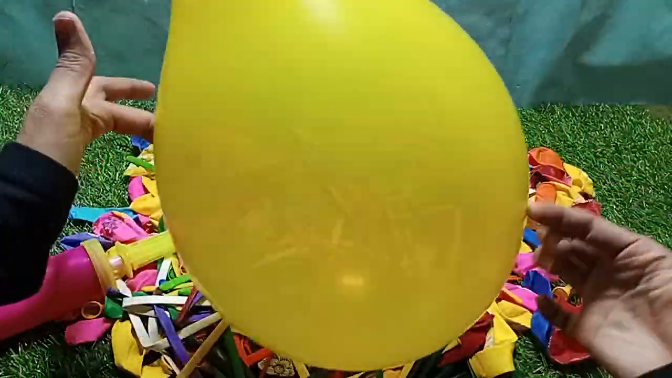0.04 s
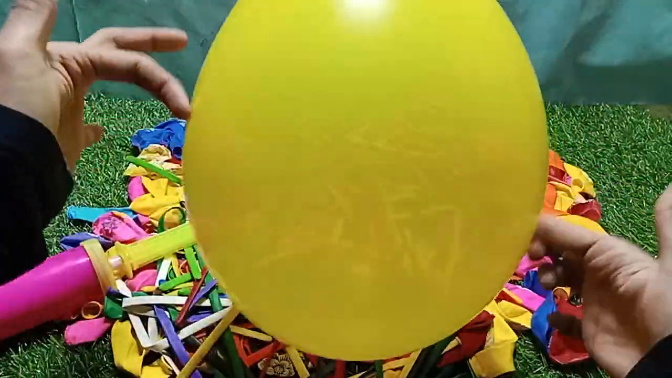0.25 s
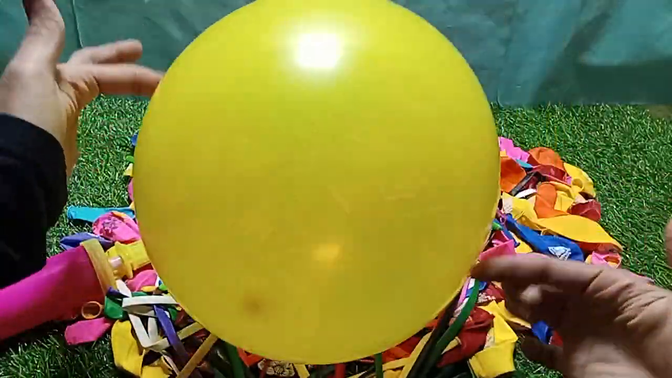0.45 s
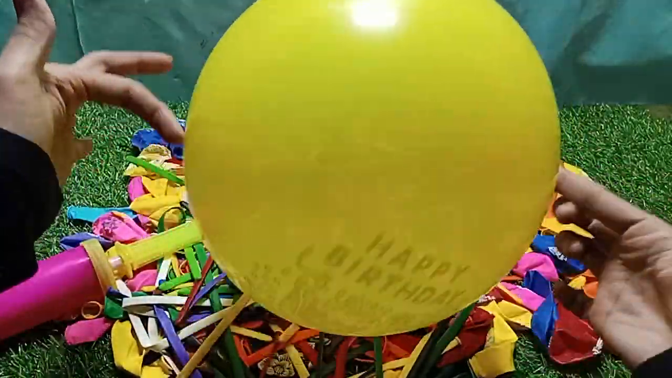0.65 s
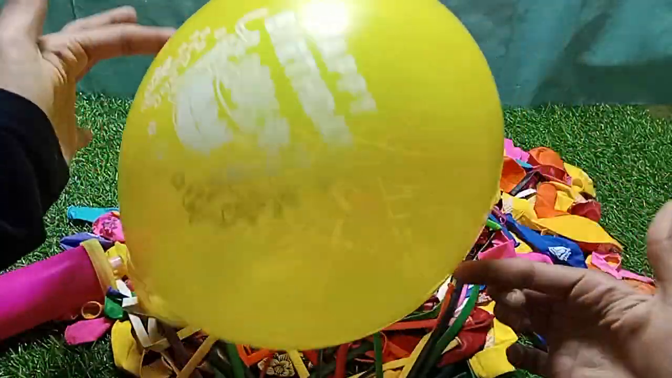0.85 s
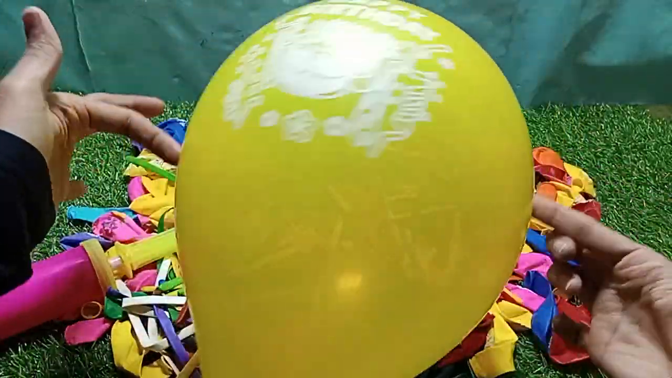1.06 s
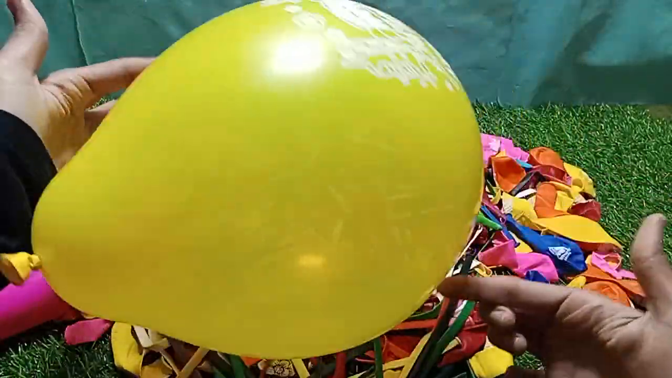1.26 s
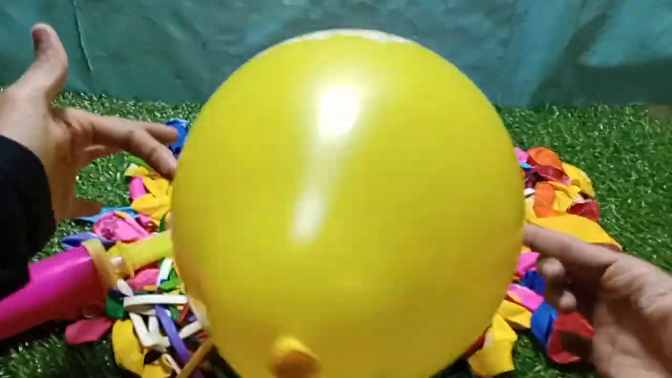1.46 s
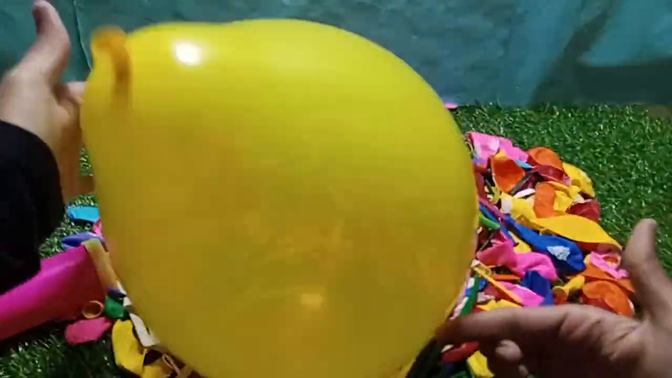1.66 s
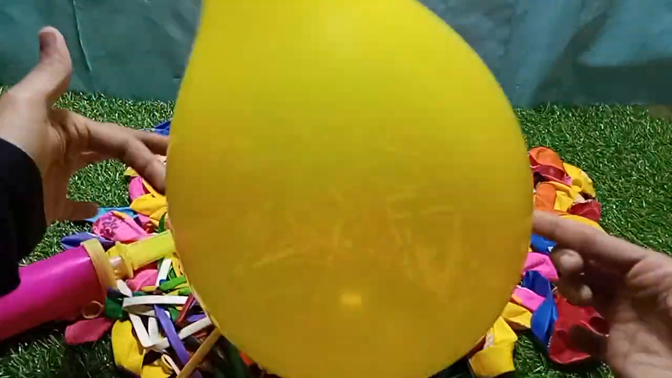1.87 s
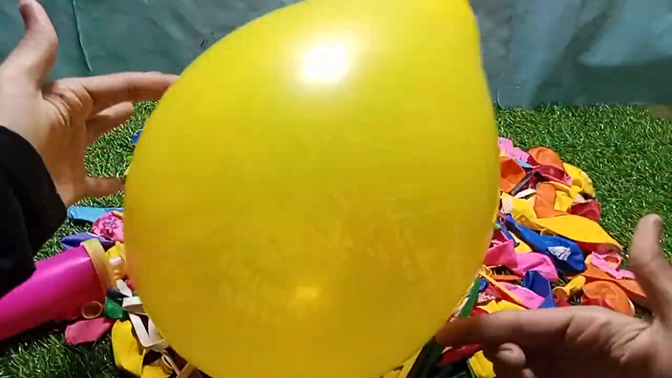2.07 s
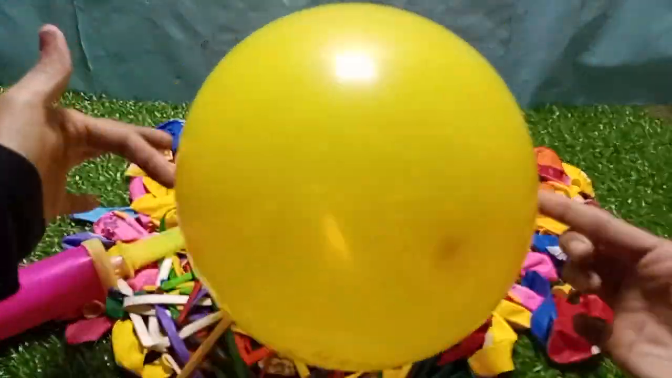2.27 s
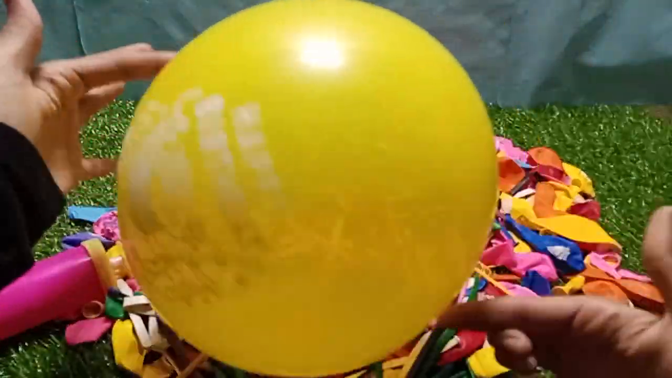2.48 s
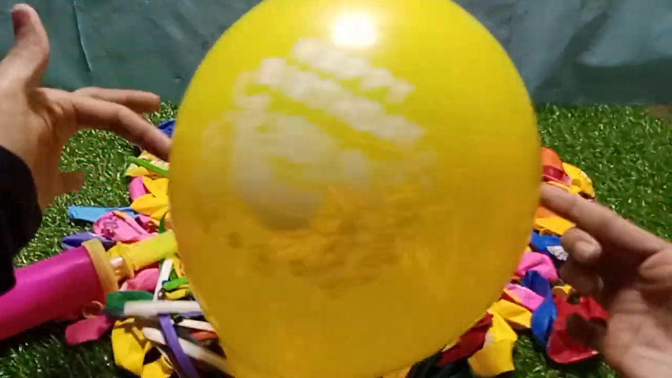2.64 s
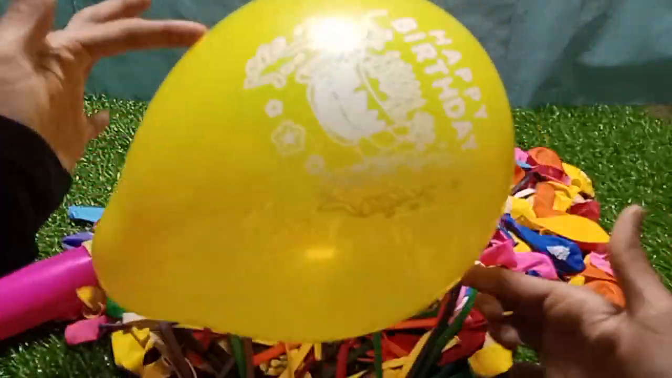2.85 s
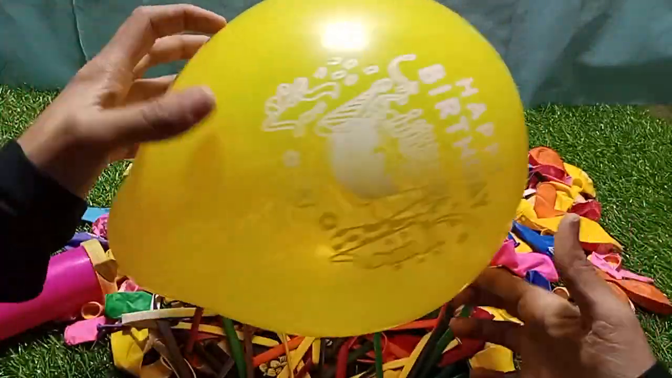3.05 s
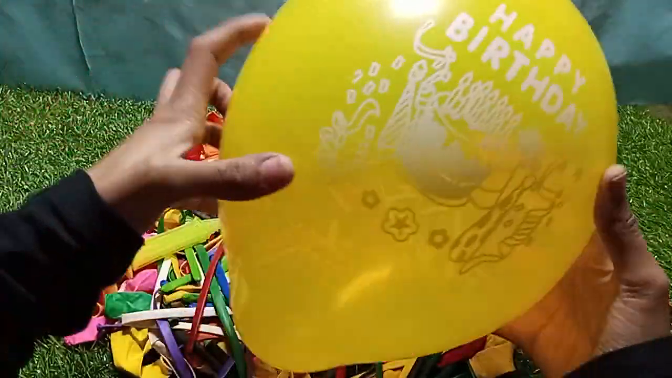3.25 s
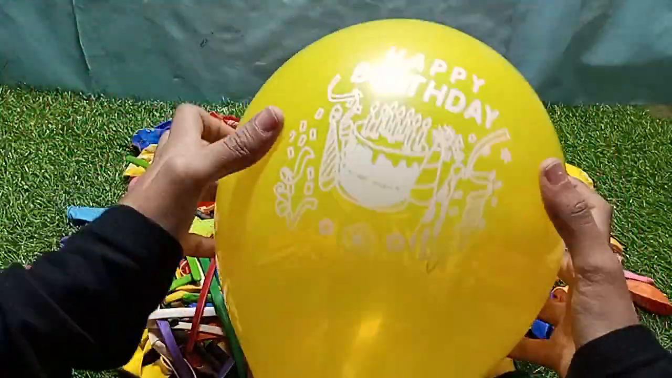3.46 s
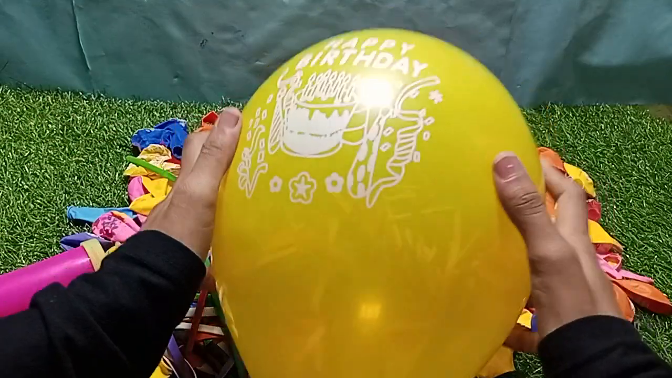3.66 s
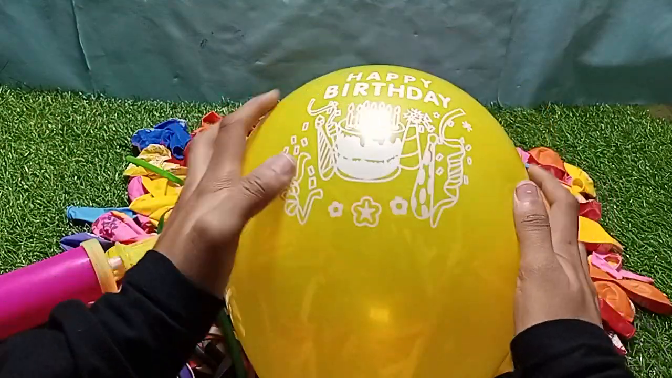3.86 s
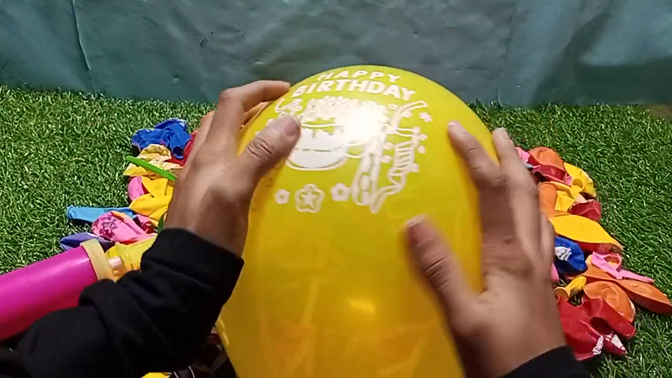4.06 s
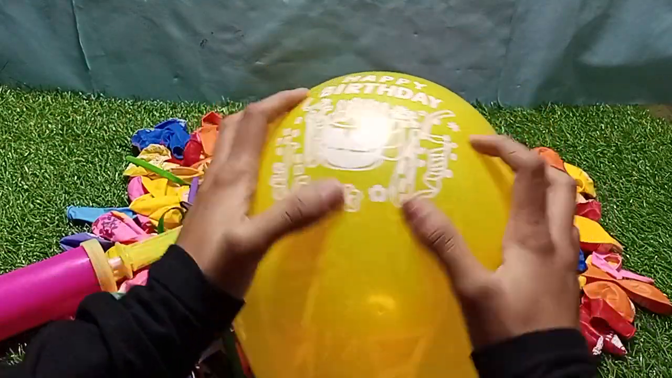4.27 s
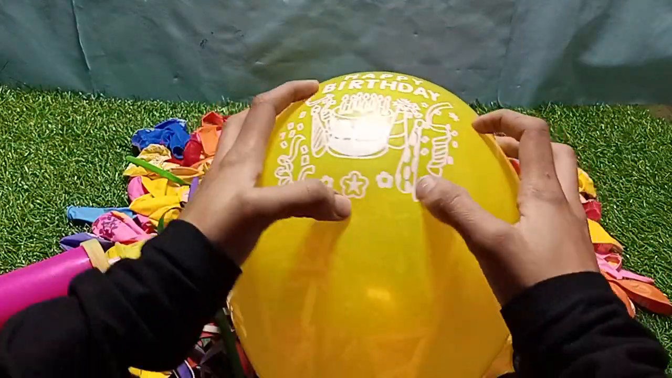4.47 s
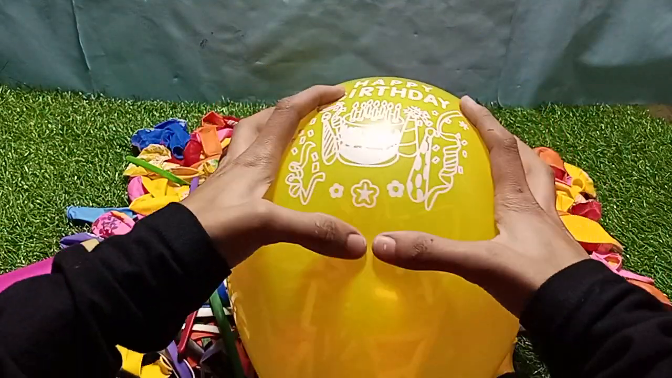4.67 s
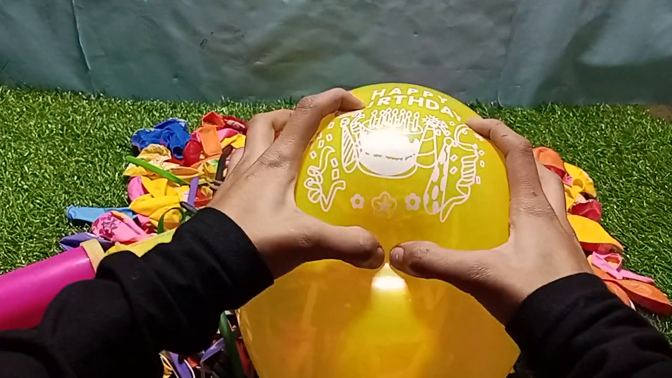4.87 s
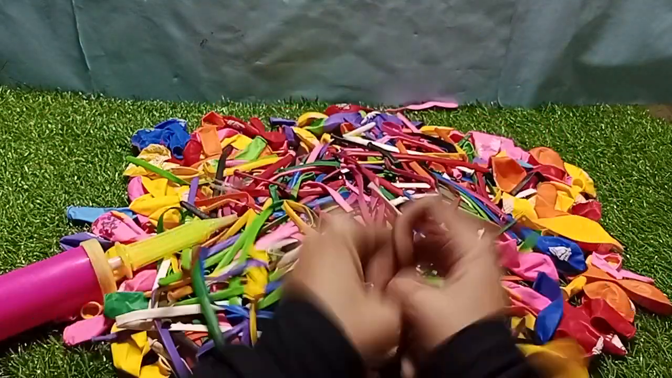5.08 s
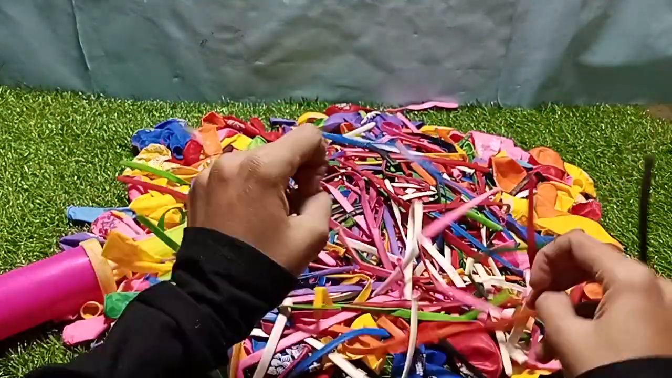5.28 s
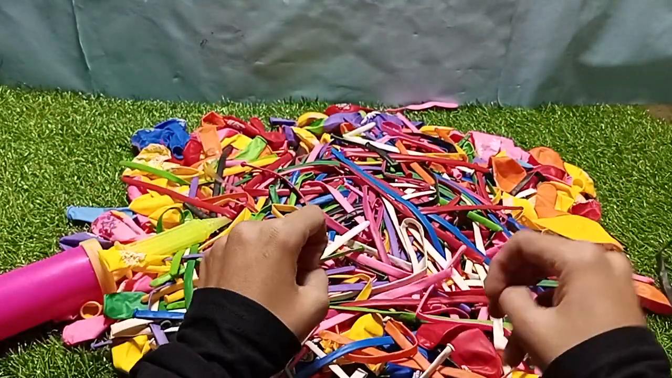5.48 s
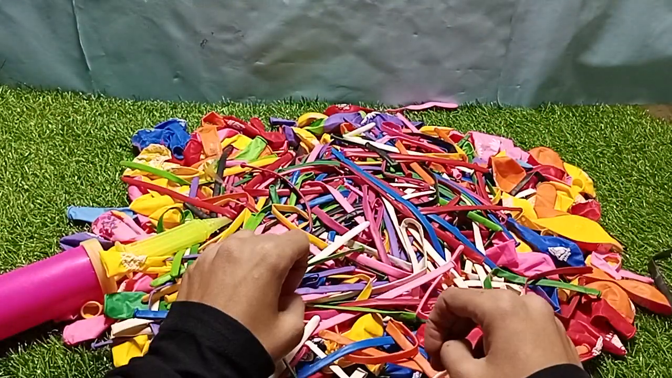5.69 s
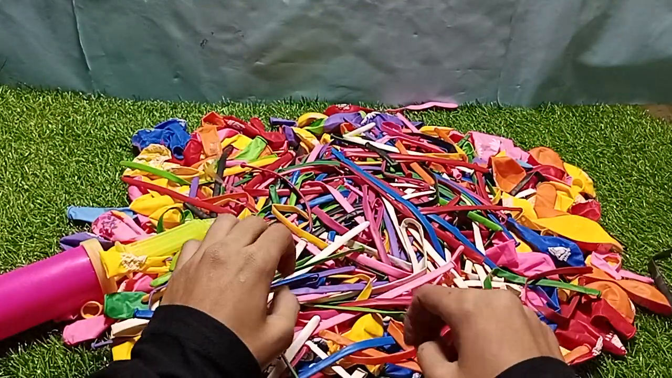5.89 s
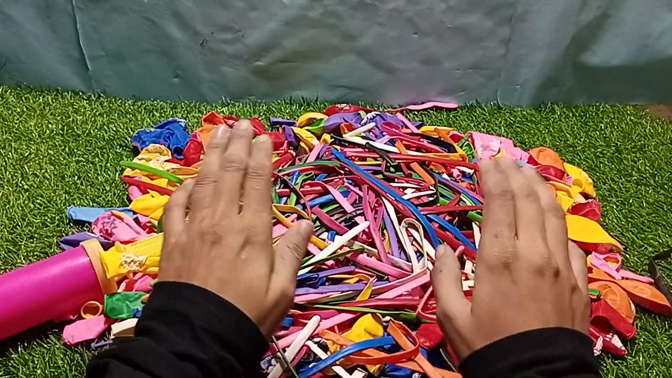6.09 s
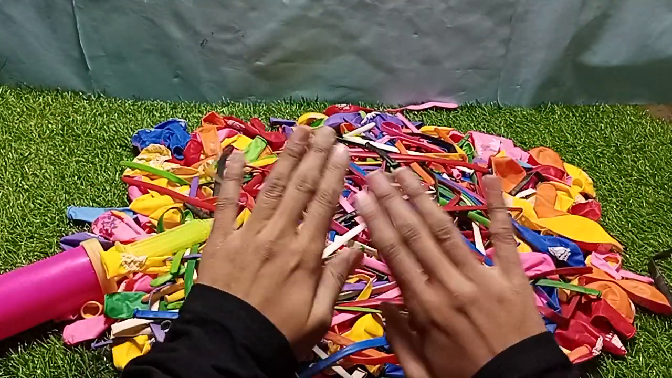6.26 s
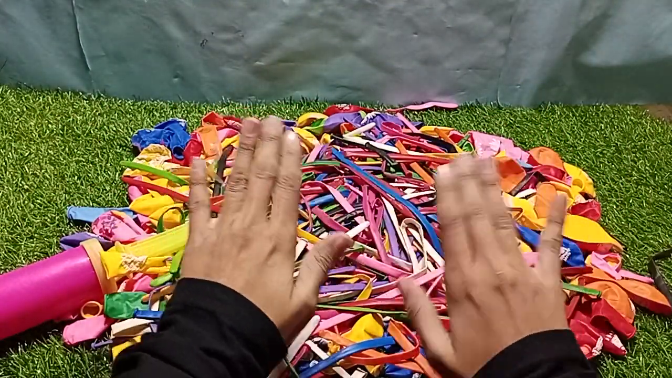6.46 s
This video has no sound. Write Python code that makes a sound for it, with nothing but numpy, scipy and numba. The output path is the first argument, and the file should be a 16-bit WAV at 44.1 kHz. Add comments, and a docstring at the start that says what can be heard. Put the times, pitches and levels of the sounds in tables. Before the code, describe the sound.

In a small quiet room, close to the microphone, fingertips softly bump and brush an inflated balloon. Hands then grip it, rubbing with dry rasp, hiss and short hoarse squeaks that grow stronger. Low hollow booms and hard snaps follow as it is squeezed, until it bursts in a very loud, slightly clipped bang with a short room ring. Small bright clinks and dull thuds follow, then faint noise.

```python
"""A small room: an inflated latex balloon is turned over in the fingers, then gripped, rubbed and squeezed until it bursts.
Random slips excite the resonances of the skin as rasp, hiss, hollow note and creak; snaps and squeaks stand out.
Ringing and gliding low sines are the air inside, booming when bumped or juddered.
The bang is shaped, decaying noise with room modes and a falling zip; then something small and hard clinks in damped sines.
Swells of low noise are hands and balloon on a heap of empty balloons, over steady air noise and a later noise floor."""
import sys
import numpy as np
from scipy import signal
from scipy.fft import rfft, irfft
from scipy.io import wavfile
from scipy.ndimage import uniform_filter1d, minimum_filter1d
from numba import njit

SR = 44100
rng = np.random.default_rng(int(sys.argv[2]) if len(sys.argv) > 2 else 0)


def dump_mix(stems):
    """Bounce the given channels to the path in sys.argv[1] as a 16-bit WAV at rate SR."""
    frames = np.atleast_2d(stems).T  # one column per channel
    limited = np.clip(frames, -1, 1)  # hard clip at full scale
    pcm = np.round(limited * 32767).astype(np.int16)
    wavfile.write(sys.argv[1], SR, pcm)


N = 287796
TIME = np.arange(N) / SR
BURST_S = 5.149

# spectrum of the rubbed skin: [f/Hz, level/dB]
SKIN_COLOUR = [(560, -30.5), (950, -4), (1230, -3), (1860, -6), (2200, -6), (2750, -5), (3360, -7.5),
               (4020, -2.5), (5210, -3.5), (6520, -1), (8060, -9.5), (10200, 2), (13400, -11.5),
               (15100, -3), (16000, -7)]
# spectrum of the creaking, scuffed skin: [f/Hz, level/dB]
CREAK_SPECTRUM = [(30, -58.5), (100, -12.5), (160, 4), (290, 5), (550, -1), (850, -5), (1100, -12),
                  (1800, -40)]


def from_db(db):
    """Decibels to amplitude."""
    return 10 ** (np.asarray(db) / 20)


def rms_one(x):
    """Scale to an rms of 1."""
    return x / np.sqrt(np.mean(x ** 2) + 1e-20)


def evened(x, seconds):
    """Hold the running rms near 1, keeping the finer grain."""
    power = uniform_filter1d(x ** 2, int(seconds * SR))
    return x / np.sqrt(np.abs(power) + 1e-12)


def along(rows, column):
    """One column of a curve at every sample."""
    rows = np.array(rows)
    return np.interp(TIME, rows[:, 0], rows[:, column])


def at_hz(points, hz):
    """Read a curve at the given frequencies, straight between its points on a log axis."""
    points = np.array(points)
    return np.interp(np.log(hz + 0.00091), np.log(points[:, 0]), points[:, 1])


def coloured(x, spectrum):
    """Causal (minimum-phase) filter with the given spectrum."""
    size = 8192
    bins_hz = np.arange(size // 2 + 1) * SR / size
    cepstrum = irfft(np.log(from_db(at_hz(spectrum, bins_hz))))
    # folding the cepstrum forward in time makes the filter minimum-phase
    cepstrum[1:size // 2] *= 2
    cepstrum[size // 2 + 1:] = 0
    impulse = irfft(np.exp(rfft(cepstrum)))
    return signal.oaconvolve(x, impulse)[:len(x)]


def noise(spectrum):
    """Steady coloured noise with an rms of 1."""
    return rms_one(coloured(rng.standard_normal(N), spectrum))


def band(x, low_hz, high_hz, order=2):
    """Butterworth band-pass."""
    edges = [low_hz, min(high_hz, SR / 2.1)]
    return signal.sosfilt(signal.butter(order, edges, "band", fs=SR, output="sos"), x + 1e-18)


def wander(rate_hz):
    """Slow chance with a spread of 1."""
    return rms_one(band(rng.standard_normal(N + SR), rate_hz / 8, rate_hz)[SR:])


def ring(hz, t60, phase=0):
    """Half a second of a dying sine."""
    t = TIME[:SR // 2]
    return np.sin(2 * np.pi * hz * t + phase) * from_db(-60 * t / t60)


def add(out, s, sound):
    """Mix a sound into out, starting at s seconds."""
    start = int(s * SR)
    out[start:start + len(sound)] += sound[:len(out) - start]


def swell(s, attack_s, length_s, sag_db_per_s, release_s):
    """Effort of one push: it grows, sags steadily and is let go."""
    t = TIME - s
    attack = np.clip(t / attack_s, 0, 1)
    sag = from_db(-sag_db_per_s * np.maximum(t - attack_s, 0))
    release = np.clip((length_s - t) / release_s, 0, 1)
    return attack * sag * release


@njit
def resonance(x, step, damping):
    """Band-pass whose centre moves (step = radians per sample)."""
    out, low, mid = np.zeros(len(x)), 0., 0.
    for i in range(len(x)):
        low += step[i] * mid
        mid += step[i] * (x[i] - low - damping * mid)
        out[i] = mid
    return out


def rippled(slips, decay_s, ripple_db):
    """A slip sends a sharp pulse, then noisy ripples that run round the skin by a new path each time."""
    keep = np.exp(-2 / (decay_s * SR))
    energy = signal.lfilter([1 - keep], [1, -keep], slips ** 2 + 1e-18)
    return slips + from_db(ripple_db) * np.sqrt(energy) * rng.standard_normal(len(slips))


def room_tail(hold_s):
    """One second of diffuse sound: level while near surfaces answer, then each band dies at its own rate."""
    # decay of the room: [f/Hz, t60/s]
    room_t60 = [(100, 0.43), (250, 0.46), (450, 0.4), (900, 0.36), (2500, 0.28), (5000, 0.34),
                (10000, 0.23), (15000, 0.27)]
    t = np.maximum(TIME[:SR] - hold_s, 0)
    edges = np.geomspace(40, 20000, 19)
    white, hz = rfft(rng.standard_normal(SR)), np.arange(SR // 2 + 1)
    tail = np.zeros(SR)
    for low, high in zip(edges, edges[1:]):
        slice_of_noise = irfft(white * ((hz >= low) & (hz < high)), SR)
        tail += slice_of_noise * from_db(-60 * t / at_hz(room_t60, np.sqrt(low * high)))
    return tail


def in_room(x, wet_db):
    """Add the diffuse reverberation of the room to the dry sound."""
    tail = room_tail(0)
    return x + from_db(wet_db) * signal.oaconvolve(x, tail / np.linalg.norm(tail))[:N]


def air():
    """Steady coloured noise of the air in the room."""
    # spectrum of the air: [f/Hz, level/dB]
    air_colour = [(15, -45.5), (25, -17.5), (48, -20), (78, -2.5), (108, 5.5), (190, -23), (285, -6),
                  (344, -21), (641, -22), (1400, -29), (5570, -36.5), (8140, -45), (13200, -49.5),
                  (14800, -45), (16000, -44.5)]
    return from_db(-68.5) * noise(air_colour)


def noise_floor(floor_from_s=4.6, fade_s=0.074, floor_db=-73):
    """A faint steady noise floor of coloured noise fades in and stays."""
    # spectrum of the noise floor: [f/Hz, level/dB]
    floor_colour = [(120, -29.5), (200, -1), (366, -7.5), (612, -9.5), (1300, -20.5), (2610, -20),
                    (3250, -24), (10100, -25.5), (13300, -28), (15100, -22.5), (16000, -35)]
    fade_in = np.clip((TIME - floor_from_s) / fade_s, 0, 1)
    return from_db(floor_db) * fade_in * noise(floor_colour)


def heap(thud_db=-2.0):
    """Hands and balloon push the heap of empty balloons in dull thuds: swells of low noise."""
    # pushes on the heap, level before thud_db: [t/s, attack/s, length/s, level/dB, sag/(dB/s)]
    heap_pushes = [(2.505, 0.13, 0.6, -54, 16), (3.06, 0.043, 0.14, -36.5, 222),
                   (3.22, 0.11, 0.36, -54, 10), (4.066, 0.16, 0.53, -55, 15), (5.385, 0.037, 0.19, -29, 9),
                   (5.78, 0.18, 0.32, -48, 152), (6.07, 0.022, 0.21, -50.5, 135)]
    # spectrum of the thuds: [f/Hz, level/dB]
    thud_colour = [(30, -33), (55, -16), (75, 2), (100, 7.5), (145, -18), (200, -16), (400, -60),
                   (1200, -68)]
    pushes = np.zeros(N)
    for s, attack_s, length_s, db, sag in heap_pushes:
        pushes += from_db(db + thud_db) * swell(s, attack_s, length_s, sag, release_s=0.085)
    rumble = evened(noise(thud_colour), 0.04)
    return pushes * rumble


def clinks(gain_db=-9.0, tick_db=-17.0, detune=0.00404):
    """Each knock of a small hard thing rings the same modes, varied a little, damped by how freely it can ring."""
    # knocks, level before gain_db: [t/s, level/dB, share of the free ring time]
    knocks = [(5.398, -31, 0.33), (5.414, -27.5, 0.35), (5.434, -20.5, 0.51), (5.444, -27, 0.85),
              (5.457, -21, 0.41), (5.474, -23.5, 0.51), (5.51, -52, .26), (5.617, -24.5, 0.055),
              (5.620, -31, 0.13), (5.718, -53, 0.23)]
    # modes of the free thing: [f/Hz, level/dB, t60/s]
    knock_modes = [(3720, -31, .2), (4130, -21, 0.24), (4850, -19, 0.28), (5360, -21, 0.28),
                   (5920, -12, 0.26), (7460, -34, .1), (8274, -12.5, 0.12), (9500, -2.5, 0.16),
                   (10860, -2, 0.14), (9940, -8, 0.29), (10860, 0.5, 0.2), (11490, 0.5, 0.083),
                   (13550, -23, 0.13), (14490, -21, .14), (14930, -5, 0.12), (15200, 6.5, 0.11)]
    out, t = np.zeros(N), TIME[:SR // 2]
    for s, knock_db, free in knocks:
        modes = np.zeros(len(t))
        for hz, db, t60 in knock_modes:
            level = from_db(db + rng.normal(0, 2.3))
            modes += level * ring(hz * rng.normal(1, detune), t60 * free, rng.uniform(0, 2 * np.pi))
        tick = rms_one(band(rng.standard_normal(len(t)), 6700, 20000, order=4)) * np.exp(-t / 0.013)
        onset = 1 - np.exp(-t / 0.0011)
        add(out, s, from_db(knock_db + gain_db) * (modes + from_db(tick_db) * tick) * onset)
    return out


def brushes(catch_db=1.5, rustle_gain_db=-6.5, hiss_gain_db=-1.5, soft_db=-24.0):
    """Light touches of the skin swell and fade as filtered noise, catching a little without gripping."""
    # touches, levels before the gains: [t/s, rustle level/dB, hiss level/dB, half width/s]
    touches = [(0.252, -52.5, -77, 0.012), (0.436, -59, -80, 0.013), (0.501, -92, -65.5, 0.0024),
               (0.525, -70.5, -97, 0.0098), (0.717, -65.5, -60.5, 0.011), (0.872, -68, -86, 0.02),
               (1.277, -69, -89, 0.014), (1.686, -69, -92, 0.017), (1.792, -81, -63, 0.014),
               (1.834, -94, -67.5, 0.043), (2.122, -64.5, -93, 0.0057), (2.388, -64.5, -88, 0.011),
               (2.553, -61, -68.5, 0.012), (2.919, -54, -61, 0.0062)]
    rustle, hiss = np.zeros((2, N))
    for s, rustle_db, hiss_db, width_s in touches:
        # the touch peaks 1/10 s into its window
        touch = np.exp(-((TIME[:SR // 5] - 1 / 10) / width_s) ** 2)
        add(rustle, s - 1 / 10, from_db(rustle_db + rustle_gain_db) * touch)
        add(hiss, s - 1 / 10, from_db(hiss_db + hiss_gain_db) * touch)
    dull = rms_one(band(noise(SKIN_COLOUR), 1210, 2700)) + from_db(soft_db) * noise(CREAK_SPECTRUM)
    bright = rms_one(band(noise(SKIN_COLOUR), 5300, 13000))
    return (rustle * dull + hiss * bright) * from_db(catch_db * wander(200))


def bumps(scuff_db=-17.0):
    """A soft push scuffs the skin and sets the air inside ringing; the longer the push, the slower the note swells."""
    # fingertip pushes: [t/s, peak level of the boom/dB, push length/s, level of the upper modes/dB]
    fingertips = [(0.223, -48, 0.019, 0.5), (0.276, -52.5, 0.0067, -1), (0.363, -36.5, 0.021, -14.5),
                  (0.427, -46, 0.005, -27), (0.863, -36.5, 0.025, -17), (4.776, -19, 0.01, -22),
                  (4.835, -21, 0.013, -19)]
    # modes of the air-filled balloon: [f/Hz, level/dB, t60/s]
    balloon_modes = [(103, -9, 0.086), (176, -20, 0.204), (212.5, -14, 0.13), (279.5, -17.5, 0.098),
                     (300, -14, 0.12), (616, -8.5, 0.064)]
    out, t = np.zeros(N), TIME[:SR // 2]
    for s, peak_db, push_s, upper_db in fingertips:
        modes = np.zeros(len(t))
        for k, (hz, db, t60) in enumerate(balloon_modes):
            # only the modes above the lowest follow upper_db
            tint_db = (upper_db + rng.normal(0, 1)) * (k > 0)
            modes += from_db(db + tint_db) * ring(hz, t60)
        boom = modes * (1 - np.exp(-(t / push_s) ** 2))
        pressure = (t / push_s * np.exp(1 - t / push_s)) ** 2
        scuff = rms_one(coloured(rng.standard_normal(len(t)), CREAK_SPECTRUM)) * pressure
        add(out, s, from_db(peak_db) * (boom / np.abs(boom).max() + from_db(scuff_db + upper_db) * scuff))
    return out


def judder(unsteady=0.38, gain_db=2.5, rise_hz_per_s=55):
    """Slow slipping of the palms keeps the lowest mode going; its note climbs as they press on."""
    # judders, level before gain_db: [t/s, attack/s, length/s, level/dB, sag/(dB/s), starting f/Hz]
    palm_slips = [(3.321, 0.069, 0.13, -43, 150, 86), (4.478, 0.042, 0.21, -40.5, 28, 97.6),
                  (4.674, 0.027, 0.11, -40.5, 5, 90.4), (4.751, 0.037, 0.34, -31.5, 74.5, 96.8)]
    out = np.zeros(N)
    for s, attack_s, length_s, db, sag, hz in palm_slips:
        t = TIME - s
        phase = 2 * np.pi * (hz + rise_hz_per_s * t / 2) * t
        effort = swell(s, attack_s, length_s, sag, release_s=0.086)
        out += from_db(db + gain_db) * effort * np.sqrt(2) * np.sin(phase)
    return out * (1 + unsteady * wander(28))


def squeaks(jitter_hz=120, rough=0.5, octave_db=-12):
    """For a moment the slips fall into step: a short, hoarse, gliding note with its octave."""
    # stutters of a finger: [t/s, level/dB, f/Hz, glide/(octaves/s), half width/s]
    stutters = [(0.88, -70, 1440, 1.5, 0.024), (1.42, -74.5, 2300, -1.5, .025),
                (2.548, -61, 2400, 6.5, 0.015), (2.904, -63, 1460, 4, 0.0064),
                (3.43, -46.5, 520, 3.5, 0.018), (3.617, -48, 520, 11.5, 0.0071),
                (3.656, -44.5, 700, -9, 0.012), (3.735, -47.5, 290, -4.5, 0.029),
                (3.796, -44, 560, -4.5, 0.021), (3.841, -46, 320, -10, 0.0088),
                (4.041, -48, 389, -4, 0.014), (4.206, -38.5, 740, -8.5, 0.03),
                (4.285, -43.5, 1020, -1, 0.019), (4.38, -47.5, 600, -2, 0.065)]
    out, t = np.zeros(N), TIME[:SR // 5] - 1 / 10
    for s, db, hz, glide, width_s in stutters:
        jitter, flutter = (rms_one(band(white, 48, 240)) for white in rng.standard_normal((2, len(t))))
        phase = 2 * np.pi * np.cumsum(hz * 2 ** (glide * t) + jitter_hz * jitter) / SR
        note = np.sin(phase) + from_db(octave_db) * np.sin(2 * phase)
        add(out, s - 1 / 10, from_db(db) * note * (1 + rough * flutter) * np.exp(-(t / width_s) ** 2))
    return out


def snaps():
    """A patch of skin lets go all at once: a pulse and its ripples, brighter as the grip stretches the skin."""
    # single hard slips: [t/s, dry peak level/dB]
    hard_slips = [(3.069, -31), (3.083, -27), (3.247, -51), (3.318, -35), (3.559, -33), (3.789, -27),
                  (4.274, -28), (4.709, -26), (4.757, -23), (4.888, -22.5), (4.934, -23.5), (4.963, -25),
                  (4.978, -26), (5.073, -23), (5.09, -28), (5.121, -29.5)]
    # treble of the snaps over time: [t/s, tilt/dB]
    snap_tilt = [(3.08, -17), (3.3, -8.5), (4.7, -5)]
    out, pulse = np.zeros(N), (TIME[:SR // 20] == 0) * 1.
    for s, peak_db in hard_slips:
        tilt_db = np.interp(s, *np.transpose(snap_tilt))
        colour = [(30, -34.5), (100, -10.5), (350, 3.5), (800, -2.5), (1200, -1.5), (2800, -6.5),
                  (4500, tilt_db), (11000, tilt_db - 13.5), (16000, tilt_db)]
        snap = coloured(rippled(pulse, decay_s=0.006, ripple_db=11), colour)
        add(out, s, from_db(peak_db) * snap / np.abs(snap).max())
    return out


def strokes(hiss_follows=1.6, release_s=0.074):
    """All strokes together: gains of rasp, hiss and hollow note, and that note's pitch, set by the strongest hand."""
    # hands on the skin, levels before the rubbing mix: [t/s, attack/s, length/s, rasp level/dB, sag/(dB/s),
    # hiss over rasp/dB, hollow note over rasp/dB, hollow note f/Hz]
    hands = [ (2.574, 0.095, 0.24, -55, 117, 3.5, 1, 404), (3.073, 0.022, 0.13, -51, 126, -15, 3, 387),
             (3.122, 0.081, 0.11, -52, 25, 2, -11, 500), (3.25, 0.021, 0.17, -64, 0, -1, 0.5, 470),
             (3.314, 0.032, 0.22, -50, 23.5, 0.5, -1, 416), (3.466, 0.051, 0.35, -54, -4.5, -1, -4, 510),
             (3.707, 0.15, 0.19, -46.5, 11, -3.5, -0.5, 372), (3.833, 0.17, 0.32, -43.5, 75, 7, -5.5, 507),
             (4.067, 0.062, 0.22, -39.5, 40, 4, -7.5, 690), (4.267, 0.023, 0.13, -38, 9, 4.5, -10, 890),
             (4.348, .035, .15, -41.5, 25, 5.5, -8, 520), (4.451, 0.079, 0.48, -42.5, 9.5, 0.5, -13, 446),
             (4.882, 0.026, 0.32, -42, 44.5, 1, -49, 400), ]
    rasp, hiss, hollow, pitch = np.zeros((4, N))
    for s, attack_s, length_s, db, sag, hiss_db, hollow_db, hz in hands:
        effort = swell(s, attack_s, length_s, sag, release_s)
        note = from_db(db + hollow_db) * effort
        pitch = np.where(note >= hollow, hz, pitch)
        rasp = np.hypot(rasp, from_db(db) * effort)
        # the hiss swells and sags more steeply than the rasp
        hiss = np.hypot(hiss, from_db(db + hiss_db) * effort ** hiss_follows)
        hollow = np.hypot(hollow, note)
    return rasp, hiss, hollow, uniform_filter1d(pitch, SR // 20)


def rubbing(spread_db=2.0, drift_octaves=0.16, rasp_db=0.0, hiss_db=-1.0, hollow_db=-1.0, creak_db=0.0,
            hollow_damping=0.7, hollow_drift_octaves=0.12):
    """Stick and slip: uneven tiny releases excite moving resonances of the skin; the patch beside the fingers rings hollow."""
    # the grip over time: [t/s, slip rate/(1/s), creak over rasp/dB]
    grip = [(2.5, 1300, -21), (3.85, 920, -25), (4.0, 3160, -50), (4.5, 2900, -24), (4.6, 1700, 0.5),
            (4.72, 660, -6.5), (5.0, 520, 6), (5.14, 540, -2)]
    # wandering resonances of the stretched skin: [f/Hz, damping, level/dB]
    skin_resonances = [(1830, 0.07, -0.5), (2510, 0.054, 3.5), (4170, 0.043, -7), (6100, .06, -2.5)]
    rasp_gain, hiss_gain, hollow_gain, hollow_hz = strokes()
    slips = (rng.random(N) < along(grip, 1) / SR) * rng.choice([-1, 1], N)
    slips = slips * from_db(spread_db * np.minimum(rng.exponential(1, N), 3.5))
    ripples = rippled(slips, decay_s=0.0047, ripple_db=2.5)

    plain = coloured(ripples, SKIN_COLOUR)
    skin = plain.copy()
    for hz, damping, db in skin_resonances:
        moving_hz = hz * 2 ** (drift_octaves * wander(25))
        skin += from_db(db) * damping * resonance(plain, 2 * np.sin(np.pi * moving_hz / SR), damping)

    # rasp below 4 kHz, hiss above
    below = signal.sosfiltfilt(signal.butter(3, 4000, fs=SR, output="sos"), skin)
    rasp = evened(below, 0.031) * rasp_gain
    hiss = evened(skin - below, .05) * hiss_gain

    step = 2 * np.pi * hollow_hz * 2 ** (hollow_drift_octaves * wander(5.6)) / SR
    hollow = resonance(resonance(ripples, step, hollow_damping), step, hollow_damping)
    hollow = evened(hollow, 0.0195) * hollow_gain
    creak = evened(coloured(ripples, CREAK_SPECTRUM), .05) * rasp_gain * from_db(along(grip, 2))
    return (from_db(rasp_db) * rasp + from_db(hiss_db) * hiss
            + from_db(hollow_db) * hollow + from_db(creak_db) * creak)


def rip(start_hz=4200, end_hz=1500, glide_s=0.0015, length_s=0.006, rip_db=-12.0):
    """The tearing skin loses its tension within milliseconds: a falling zip."""
    t, out = TIME[:SR // 20], np.zeros(N)
    hz = end_hz + (start_hz - end_hz) * np.exp(-t / glide_s)
    zip_tone = np.sin(2 * np.pi * np.cumsum(hz) / SR) * np.exp(-(t / length_s) ** 2)
    add(out, BURST_S, from_db(rip_db) * zip_tone)
    return out


def burst(bang_db=-4.5, hold_s=0.043, bass_rise_s=0.02):
    """The skin rips; near surfaces throw back a dense volley, then the room rings out."""
    # spectrum of the bang: [f/Hz, level/dB]
    bang_colour = [(35, -51.5), (60, -22.5), (96, -13), (130, -20.5), (160, -10.5), (198, -12), (437, -3),
                   (503, -5.5), (666, -7.5), (1040, -19.5), (2350, -22.5), (6000, -20.5), (13600, -29),
                   (14900, -24), (16000, -19.5)]
    # modes of the room: [f/Hz, level/dB, t60/s]
    room_modes = [(255.2, -23.5, 0.39), (289.5, -20, .4), (331.8, -17.5, 0.28), (380, -20.5, 0.32),
                  (416, -15, 0.5), (460, -16, 0.56), (558, -24, 0.55), (665.3, -14.5, 0.12),
                  (883, -22.5, 0.41)]
    t = TIME[:SR]
    bang = coloured(room_tail(hold_s), bang_colour)
    # the level is set over the first 50 ms
    bang = from_db(bang_db) * bang / np.std(bang[:SR // 20])
    bass = signal.sosfiltfilt(signal.butter(2, 1000, fs=SR, output="sos"), bang)
    modes = sum(from_db(db) * ring(hz, t60, rng.uniform(0, 2 * np.pi)) for hz, db, t60 in room_modes)
    # the low notes of the room take a moment to build up
    build_up = 1 - 0.74 * np.exp(-t / bass_rise_s)
    out = np.zeros(N)
    add(out, BURST_S, bang - bass + bass * build_up)
    add(out, BURST_S, modes * build_up[:len(modes)])
    return out


def scene():
    """Handling and clinks with room reverberation, plus boom, bang, heap, noise floor and air."""
    handling = in_room(rubbing() + squeaks() + snaps() + brushes() + clinks(), wet_db=-15.5)
    return (handling + bumps() + judder() + burst() + rip() + heap() + noise_floor() + air())[None]


def limited(x, ceiling_db, hold_s, release_db_per_s):
    """Limiter: the gain drops just ahead of a peak, is held, then recovers."""
    over_db = np.maximum(20 * np.log10(np.abs(x) + 1e-9) - ceiling_db, 0)
    half = int(hold_s * SR / 2)
    held = -minimum_filter1d(-over_db, 2 * half + 1, origin=half)
    ramp = release_db_per_s * TIME
    reduction_db = np.maximum.accumulate(held + ramp) - ramp
    return x * from_db(-uniform_filter1d(reduction_db, SR // 1000))


def record(dry, low_cut_hz=35, top_cut_hz=15900):
    """The microphone loses the deepest bass, a limiter rides the peaks, a hard clip flattens them and the top is cut."""
    heard = signal.sosfilt(signal.butter(2, low_cut_hz, "high", fs=SR, output="sos"), dry[0])
    tamed = limited(heard, ceiling_db=-1.5, hold_s=0.066, release_db_per_s=183.0)
    clipped = np.clip(tamed, -.62, .62)
    return signal.sosfilt(signal.ellip(10, .1, 80, top_cut_hz, fs=SR, output="sos"), clipped)[None]


dry = scene()
out = record(dry)
dump_mix(out)
```